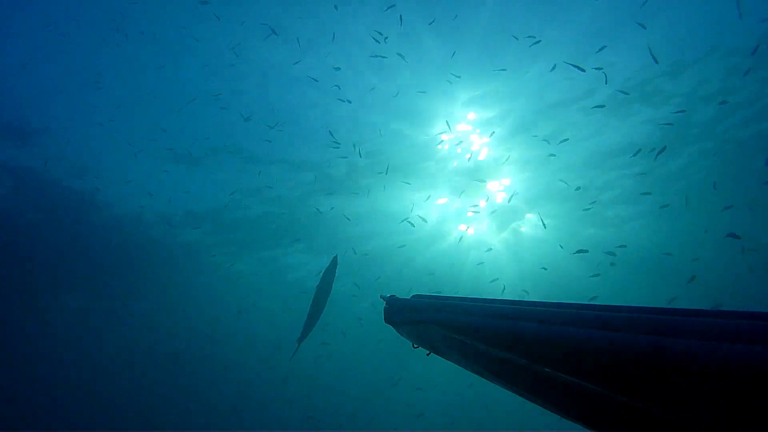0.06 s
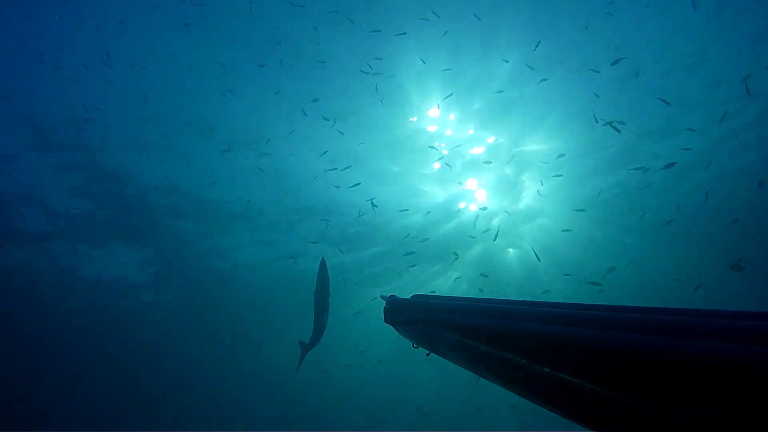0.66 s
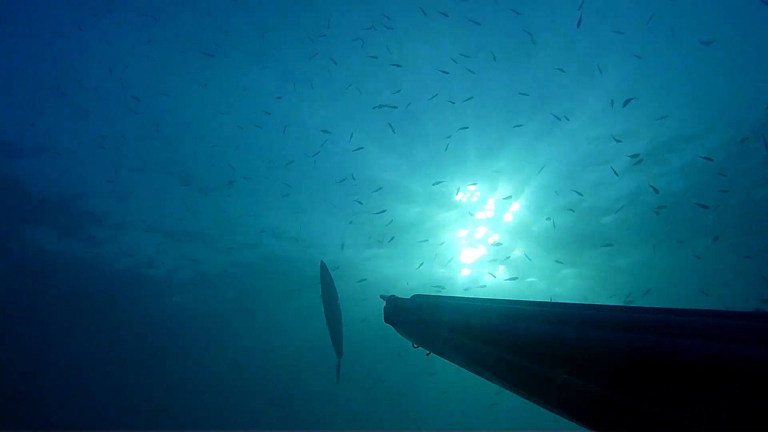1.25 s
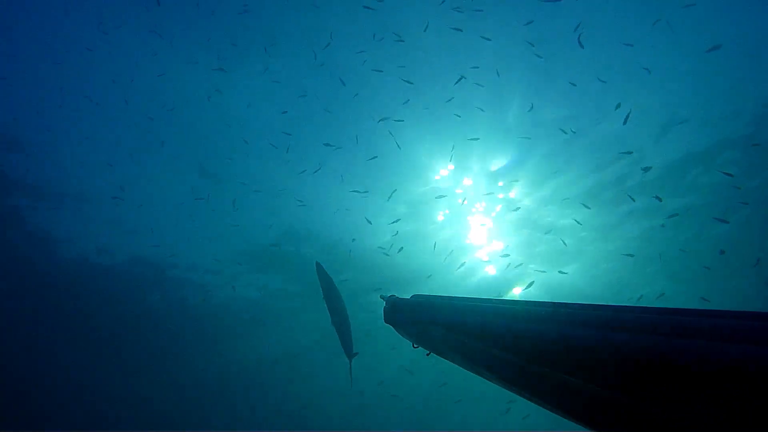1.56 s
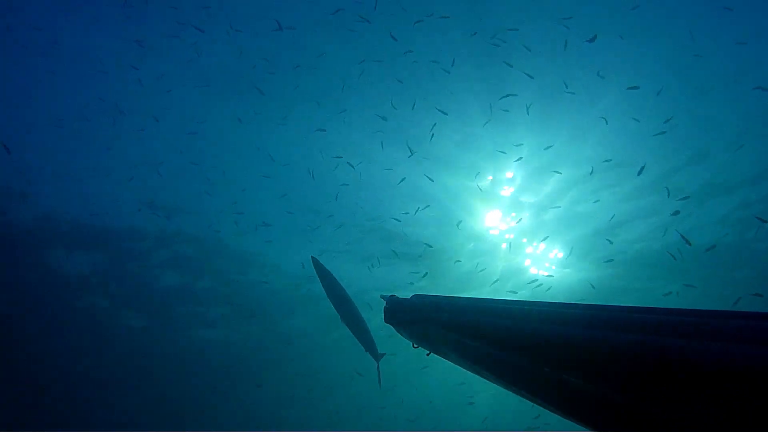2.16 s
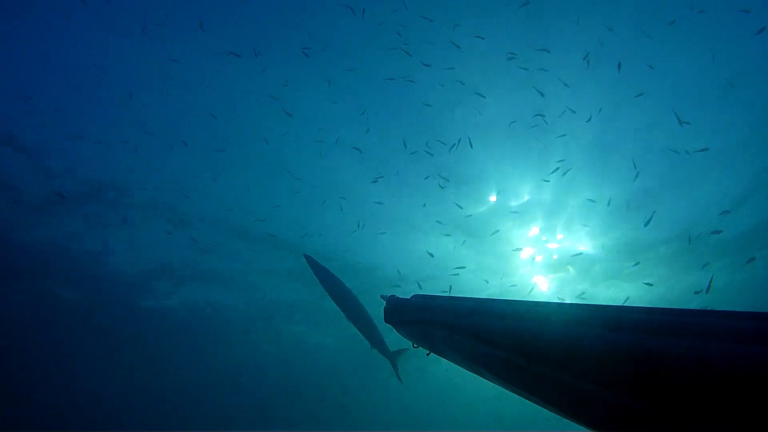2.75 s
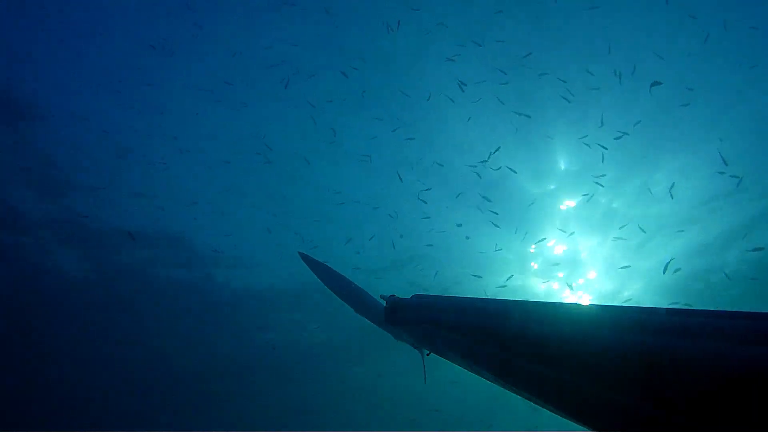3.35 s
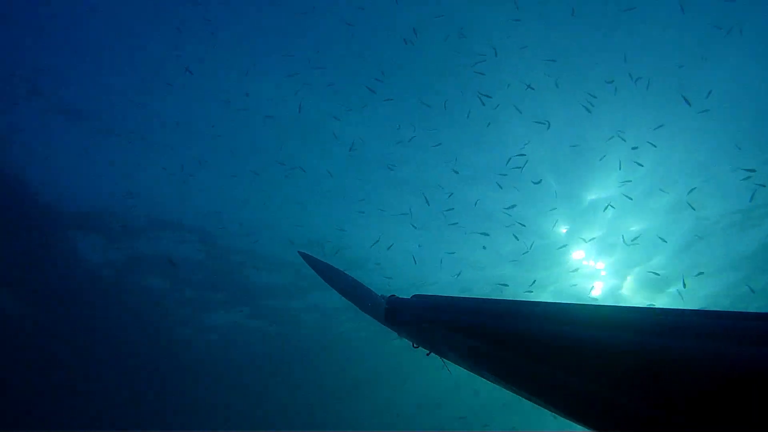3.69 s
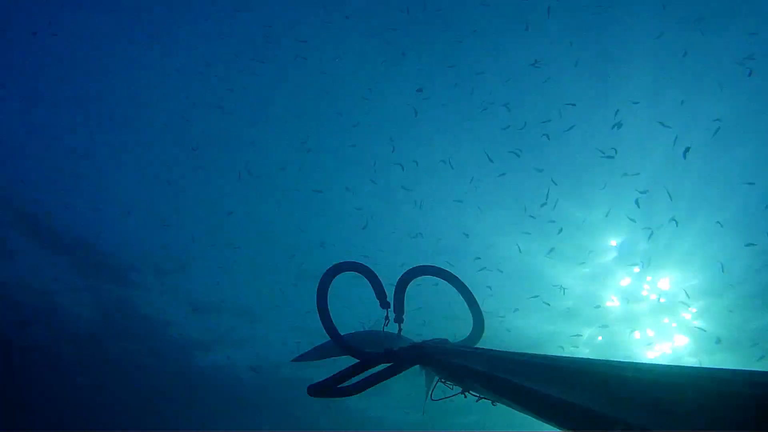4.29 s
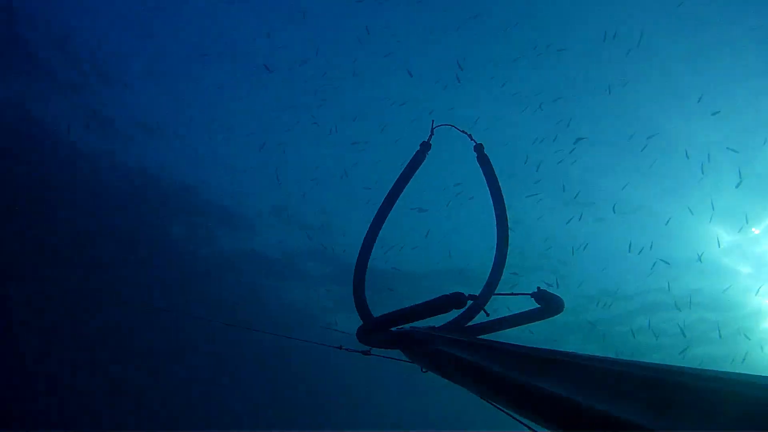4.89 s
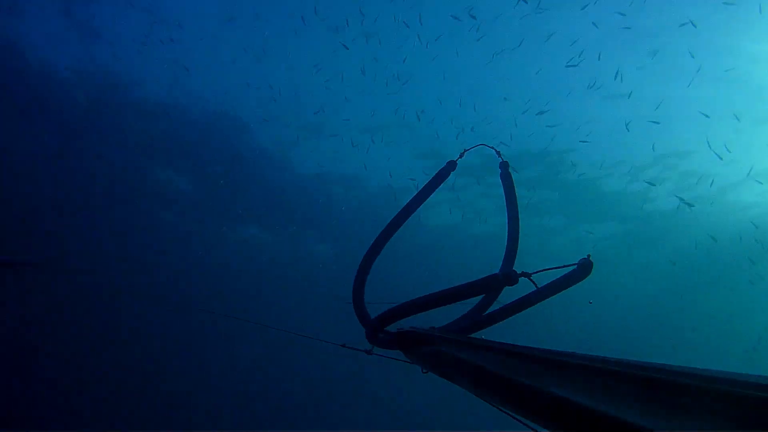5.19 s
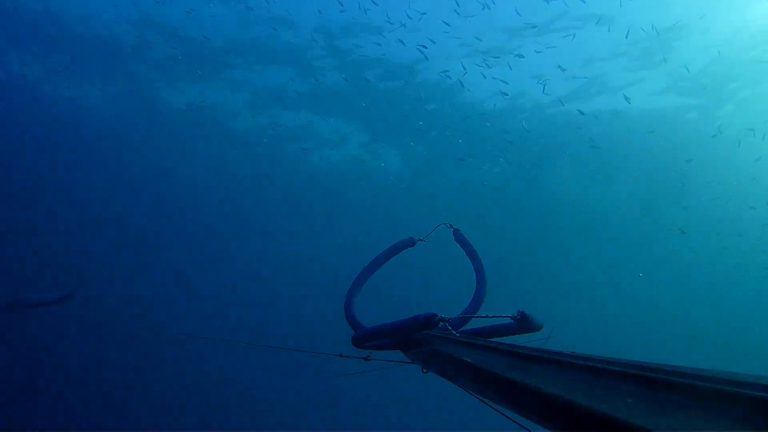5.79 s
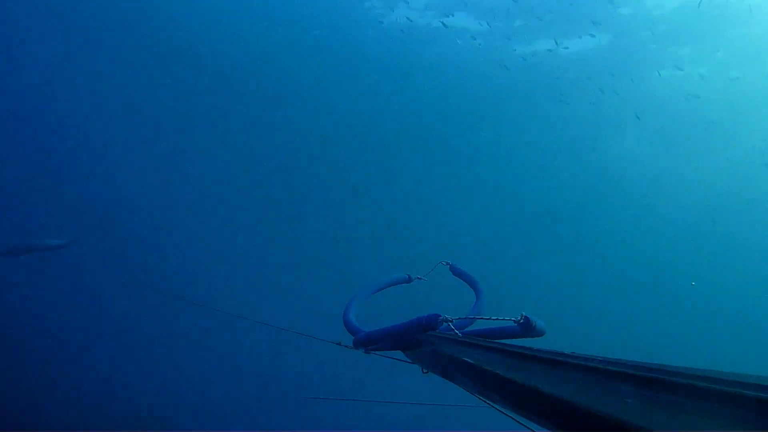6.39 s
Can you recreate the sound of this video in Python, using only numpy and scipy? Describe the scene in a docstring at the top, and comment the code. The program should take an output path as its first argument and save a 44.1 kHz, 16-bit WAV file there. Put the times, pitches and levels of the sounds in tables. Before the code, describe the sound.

A speargun fires underwater with a loud, distorted thump, a short rattle and a whizzing line, amid faint crackling shrimp.

```python
"""A band-powered speargun fired under water, heard from a microphone in a housing on its barrel.
Over the dull wash of the sea, shrimp snap all around while the gun rocks and knocks lightly. At 4.26 s
it fires: the recoil overloads the microphone and the rubbers drive the shaft rattling down its track.
The line whizzes out and jerks taut at 4.77 s. The slack rubbers and their wishbones rub and knock on
the gun, then settle as the wake fizzes away under the shrimp."""
import sys
import numpy as np
from scipy import signal
from scipy.fft import rfft, irfft, next_fast_len
from scipy.io import wavfile
from scipy.ndimage import uniform_filter1d

SR = 44100
rng = np.random.default_rng(int(sys.argv[2]) if len(sys.argv) > 2 else 0)


def master(y):
    """Save y as 16-bit WAV."""
    cut = np.clip(np.atleast_2d(y).T, -1, 1)
    pcm = np.round(cut * 32767)  # scale
    wavfile.write(sys.argv[1], SR, pcm.astype(np.int16))


N = 284004
FIRE_S, STROKE_S = 4.258, .13   # the trigger lets go; time the shaft takes to clear the track
SHAFT_GONE_S = FIRE_S + STROKE_S


def from_db(db):
    """Decibels to gain."""
    return 10 ** (np.asarray(db) / 20)


def unit_rms(x):
    """Scale to unit power."""
    return x / np.sqrt(np.mean(x ** 2) + 1e-20)


def steady(x, window_s):
    """Ride out the slow swells of a vibration, holding it at unit power."""
    return x / np.sqrt(np.abs(uniform_filter1d(x * x, max(int(window_s * SR), 8))) + 1e-12)


def add(track, start_s, sound):
    """Mix a sound into a track at a time."""
    start = int(start_s * SR)
    track[start:start + len(sound)] += sound[:N - start]


def envelope(start_s, attack_s, hold_s, release_s, sag_db_per_s=0):
    """Rise 60 dB per attack time up to the start, hold with a sag, then fall 60 dB per release time."""
    t = np.arange(N) / SR - start_s
    attack_db = 60 * np.minimum(t, 0) / attack_s
    sag_db = sag_db_per_s * np.clip(t, 0, hold_s)
    release_db = 60 * np.maximum(t - hold_s, 0) / release_s
    return from_db(np.maximum(attack_db - sag_db - release_db, -200))


def shaped_noise(spectrum):
    """Steady unit-power noise with a given EQ curve."""
    hz, db = np.transpose(spectrum)
    size = next_fast_len(N)
    bin_hz = np.maximum(np.arange(size // 2 + 1) * SR / size, 1)
    colour = from_db(np.interp(np.log(bin_hz), np.log(hz), db))
    return unit_rms(irfft(rfft(rng.standard_normal(size)) * colour, size)[:N])


def grains(per_s, spread_db):
    """Random clicks of uneven size."""
    sizes = from_db(spread_db * np.minimum(rng.exponential(1, N), 4)) * rng.choice([-1, 1], N)
    return sizes * (rng.random(N) < per_s / SR)


def resonate(x, modes):
    """Parallel resonances, with the skirts outside the group trimmed steeply."""
    out = 0
    for k, (hz, width_hz, db) in enumerate(modes):
        radius = np.exp(-np.pi * width_hz / SR)
        poles = [1, -2 * radius * np.cos(2 * np.pi * hz / SR), radius ** 2]
        ringing = (1 - radius ** 2) / 2 * signal.lfilter([1, 0, -1], poles, x + 1e-18)
        out = out + (-1) ** k * from_db(db) * ringing
    edges_hz = [modes[0][0] * .46, min(modes[-1][0] * 1.217, .45 * SR)]
    return signal.sosfilt(signal.butter(3, edges_hz, "band", fs=SR, output="sos"), out)


def hit(modes, contact_s, scatter_db, scatter_t60, strike_db=-10):
    """A strike, a rough contact and a dying scatter of echoes ring the modes; unit power over 20 ms."""
    t = np.arange(SR // 7) / SR
    contact = t / contact_s * np.exp(1 - t / contact_s)
    scatter = from_db(scatter_db - 60 * t / scatter_t60)
    force = rng.standard_normal(len(t)) * (contact + scatter)
    force[0] += from_db(strike_db) * np.sqrt(np.sum(force ** 2))
    sound = resonate(force, modes)
    return sound / np.sqrt(np.mean(sound[:SR // 50] ** 2))


# EQ curve of the open sea: (frequency [Hz], relative level [dB])
SEA_SPECTRUM = [(29, -25), (50, -7), (81, -7), (204, -5), (476, -8.5), (547, -7.5), (1050, -16.5),
                (1880, -23), (2000, -34), (2600, -41), (4400, -120)]


def sea():
    """The dull wash of open water."""
    return from_db(-54.5) * shaped_noise(SEA_SPECTRUM)


# EQ curve of the far shrimp bed: (frequency [Hz], relative level [dB])
FRYING_SPECTRUM = [(1200, -7.5), (2000, -0.5), (2950, 0), (3900, -4.5), (4500, -3), (5800, -11.5),
                   (6900, -0.5), (8200, -10), (9300, -6), (10100, -12), (10900, -5), (11800, -13.5),
                   (15700, -14.5), (16400, -56)]
# the housing's mid and top modes, rung by snaps in the water: (pitch [Hz], width [Hz], gain [dB])
BODY_MODES = [(1555, 74, -2.5), (2022, 63, -1.5), (2475, 250, -6), (2933, 126, -2), (3627, 234, -6),
              (4350, 74, -3), (4690, 130, -3.5)]
SIZZLE_MODES = [(5380, 410, -1.5), (6920, 1000, -0.5), (9040, 740, -1), (10020, 940, -3.5),
                (12200, 3300, -13)]
# the colony, a nearer and a farther layer: (rate [snaps/s], size spread [dB], body [dB], sizzle [dB])
COLONY_LAYERS = [(8.96, 1.5, -75.5, -76), (70.3, .3, -70, -70.5)]
# foreground snaps, levels before trim: (time [s], body [dB], sizzle [dB], cavity pitch [Hz])
CLOSE_SNAPS = [(0.154, -47.5, -56, 2920), (0.383, -42.5, -51.5, 2120), (0.7458, -50.5, -51, 4410),
               (0.849, -51, -49.5, 2920), (0.8958, -43, -47.5, 3040), (1.021, -65, -55, 3050),
               (1.465, -42, -56, 2800), (1.49, -55, -48.5, 3860), (1.5447, -43.5, -51.5, 2750),
               (1.687, -47, -51, 4380), (1.7657, -40, -50, 2980), (2.1976, -44.5, -48.5, 4400),
               (2.5062, -60, -51, 3000), (2.5666, -41.5, -55, 3140), (2.6507, -54, -52.5, 2880),
               (2.7676, -49.5, -62, 4300), (2.798, -58, -54, 4340), (2.8807, -39, -67, 2440),
               (3.0223, -55, -56, 2590), (3.255, -49.5, -61, 3400), (3.6534, -54.5, -51.5, 2760),
               (3.769, -45, -58, 2960), (3.7966, -42.5, -44.5, 4660), (3.945, -52, -50.5, 3030),
               (4.0066, -58, -52, 3040), (4.0264, -55, -54, 4400), (5.1527, -59, -51, 4460),
               (5.6418, -40, -43.5, 3550), (5.7752, -39, -39, 2880), (5.812, -57, -47, 4400),
               (6.002, -38.5, -49, 2480), (6.122, -55, -50.5, 2720), (6.139, -50.5, -49, 2400),
               (6.2487, -44.5, -38.5, 4470), (6.3686, -39.5, -51, 2920)]


def shrimp():
    """Each snap is a collapsing cavity and its scatter off rocks and surface; far ones merge to frying."""
    out = from_db(-63) * shaped_noise(FRYING_SPECTRUM)
    for per_s, spread_db, body_db, sizzle_db in COLONY_LAYERS:
        snaps = grains(per_s, spread_db)
        body_clicks = snaps * rng.random(N)
        body_ring = hit(BODY_MODES, contact_s=.001, scatter_db=-10, scatter_t60=.08)
        body = signal.fftconvolve(body_clicks, body_ring)[:N]
        sizzle = np.zeros(N)
        for hz, width_hz, db in SIZZLE_MODES:
            clicks = snaps * rng.random(N) ** 2   # every snap has its own colour
            ring = hit([(hz, width_hz, db)], contact_s=.0011, scatter_db=-11, scatter_t60=.066)
            sizzle += from_db(db) * signal.oaconvolve(clicks, ring)[:N]
        out += from_db(body_db) * unit_rms(body) + from_db(sizzle_db) * unit_rms(sizzle)
    for time_s, body_db, sizzle_db, cavity_hz in CLOSE_SNAPS:
        # modes lose 11 dB per octave of distance from the cavity's pitch
        modes = [(hz, width, db - 11 * abs(np.log2(hz / cavity_hz))) for hz, width, db in BODY_MODES]
        body = hit(modes, contact_s=.00052, scatter_db=2.5, scatter_t60=.11)
        sizzle = hit(SIZZLE_MODES, contact_s=.0015, scatter_db=-5, scatter_t60=.14)
        crack = hit(BODY_MODES + SIZZLE_MODES, contact_s=.00018, scatter_db=-18, scatter_t60=.036)
        add(out, time_s, from_db(body_db - 9) * body)
        add(out, time_s, from_db(sizzle_db - 9.5) * sizzle + from_db(sizzle_db - 15) * crack)
    return out


# fader curve of the gun's slow rocking: (time [s], level [dB])
SWAY_CURVE = [(0, -58), (.8, -50), (1.3, -59), (1.75, -49.5), (2.05, -58), (2.85, -48.5), (3.6, -58),
              (4.16, -47), (5.55, -59), (6.301, -52)]
# jolts that swing the gun and flail the rubbers, as the shaft leaves and as the line jerks taut:
# (time [s], sway [dB], eddies [dB], rubbing [dB], rasp [dB], t60 [s])
GUN_JOLTS = [(4.448, -23.5, -29, -26, -32, 0.59), (4.773, -33.5, -33, -27.5, -44.5, 0.77)]
JOLT_ATTACK_S = .058


def sway():
    """The gun rocks in the water: a sub rumble that swells with each jolt."""
    level = from_db(np.interp(np.arange(N) / SR, *np.transpose(SWAY_CURVE)))
    for time_s, sway_db, *_, t60 in GUN_JOLTS:
        level += from_db(sway_db) * envelope(time_s, JOLT_ATTACK_S, 0, t60)
    rumble = resonate(rng.standard_normal(N), [(28.25, 8.9, 0)])
    return level * steady(rumble, window_s=.2)


# the gun's modes in four bands, low to high: (pitch [Hz], width [Hz], gain [dB])
THUMP_MODES = [(81, 11.4, -10), (176.4, 35, -10)]
KNOCK_MODES = [(565.2, 51, -0.5), (632, 40, -5), (721.6, 40.5, -2.5)]
CLACK_MODES = [(1110, 113, -14), (1462.5, 78, -1.5), (1579, 102, -7.5), (1705, 112, -7)]
RING_MODES = [(2934, 370, 1.5), (3193, 56, -1), (3353, 142, 4.5), (3510, 290, -10), (4390, 230, -8.5),
              (4820, 200, -9)]
# hits on the gun, levels before trim: (time [s], thump [dB], knock [dB], clack [dB], ring [dB])
GUN_HITS = [(0.618, -42.5, -41, -50, -75), (0.631, -52, -48, -66, -75), (1.062, -54, -48.5, -52.5, -74),
            (3.189, -44, -68, -65, -79), (4.221, -54, -36.5, -46, -59), (4.453, -21, -27, -23.5, -42),
            (4.466, -40, -23, -26, -39), (4.486, -36, -24, -29, -38.5), (4.52, -21.5, -18, -30, -52),
            (4.5405, -32, -20.5, -14.5, -30), (4.581, -53, -29, -26, -57), (4.615, -41, -38, -51, -50),
            (4.705, -38, -32.5, -45, -40.5), (4.726, -43, -41, -42, -35.5), (4.759, -32, -28, -56, -27.5),
            (4.7694, -26, -14, -30, -25.5), (4.808, -34, -25.5, -27.5, -45.5), (4.842, -44, -44, -39, -59),
            (4.86, -56, -54, -40, -62), (4.951, -39, -52, -38, -55), (4.97, -50, -36, -43, -57),
            (5.043, -45, -47, -50, -56), (5.08, -55, -36, -30, -56), (5.26, -46.5, -36.5, -50, -55),
            (5.508, -44.5, -47, -49.5, -62), (5.773, -47.5, -51.5, -35.5, -55)]


def knocks():
    """Soft rubber rings the low modes of the gun, steel the high ones."""
    out = np.zeros(N)
    for time_s, thump_db, knock_db, clack_db, ring_db in GUN_HITS:
        thump = hit(THUMP_MODES, contact_s=.0023, scatter_db=-6, scatter_t60=.092, strike_db=3)
        knock = hit(KNOCK_MODES, contact_s=.0018, scatter_db=-4, scatter_t60=.15, strike_db=4)
        clack = hit(CLACK_MODES, contact_s=.0007, scatter_db=-23, scatter_t60=.067, strike_db=-1)
        ring = hit(RING_MODES, contact_s=.0012, scatter_db=-24, scatter_t60=.05, strike_db=-19)
        add(out, time_s, from_db(thump_db - 3.5) * thump + from_db(knock_db - 3) * knock)
        add(out, time_s, from_db(clack_db - 6.5) * clack + from_db(ring_db - 6) * ring)
    return out


# kicks that swing and flex the whole gun: (time [s], pitch [Hz], level [dB], t60 [s])
RECOIL_KICKS = [(4.2584, 28.4, -7.5, 0.33), (4.2563, 68.1, 9.5, 0.16), (4.290, 182, 6, 0.22),
                (4.398, 28.2, -13, 0.31), (4.765, 26.6, -17.5, 0.49), (4.77, 77, -34, 0.24)]


def recoil():
    """Each kick starts a low, damped swing; the first ones are strong enough to overload the input."""
    out, t = np.zeros(N), np.arange(SR) / SR
    for time_s, hz, level_db, t60 in RECOIL_KICKS:
        add(out, time_s, from_db(level_db - 60 * t / t60) * np.sin(2 * np.pi * hz * t))
    return out


# boom of water churned by the rubbers: (pitch [Hz], width [Hz], gain [dB])
SURGE_MODES = [(44.1, 47, 0), (104.2, 36, -5.5), (177.3, 49, 2)]


def surge():
    """The rubbers churn the water around the housing, weaker as they shorten."""
    level = from_db(4) * envelope(FIRE_S, .0056, STROKE_S, .07, sag_db_per_s=96)
    return level * steady(resonate(rng.standard_normal(N), SURGE_MODES), window_s=.0172)


def pitch_drop(x, start_s, from_ratio, glide_s):
    """Read a vibration fast at first, so that its pitch sinks to its own value."""
    t = np.maximum(np.arange(N) / SR - start_s, 0)
    ahead_s = (from_ratio - 1) * glide_s * (1 - np.exp(-t / glide_s))
    return np.interp(np.arange(N) + ahead_s * SR, np.arange(N), x)


# hardest slams of shaft and wishbones on the track, before trim: (time [s], force [dB], ring offset [dB])
TRACK_SLAMS = [(4.2572, 6, 0), (4.2604, 9, 1), (4.2707, 1, -6), (4.2816, 12.5, -12), (4.2922, 7, -4),
               (4.2993, 5.5, -8.5), (4.32, 3, -10), (4.348, -9, -4), (4.37, -12, 2.5), (4.385, -10.5, -3),
               (4.4399, -12, -3)]


def shaft():
    """The shaft grinds, bounces and slams along its track; friction fades as the rubbers shorten."""
    slide_s = 4.28
    friction = from_db(3.5) * envelope(slide_s, .032, SHAFT_GONE_S - slide_s, .047, sag_db_per_s=104)
    slips = grains(per_s=2700, spread_db=2.5)
    grind = from_db(-6) * steady(resonate(slips, KNOCK_MODES), window_s=.0052)
    grind += from_db(-13) * steady(resonate(slips, CLACK_MODES), window_s=.012)
    # the track's main resonance sinks as the rubbers slacken
    groan = steady(resonate(slips, [(564.6, 44, 0)]), window_s=.011)
    groan = pitch_drop(groan, slide_s, from_ratio=1.3, glide_s=.045)
    bounces = grains(per_s=280, spread_db=.5)
    rattle = unit_rms(resonate(bounces, CLACK_MODES))
    rattle += from_db(-7) * unit_rms(resonate(bounces, RING_MODES))
    rattle += from_db(-10.5) * unit_rms(resonate(bounces, SIZZLE_MODES))
    out = friction * (grind + from_db(-2) * groan + from_db(-15.5) * rattle)
    for time_s, force_db, ring_db in TRACK_SLAMS:
        clack = hit(CLACK_MODES, contact_s=.00034, scatter_db=-32, scatter_t60=.048, strike_db=-1.5)
        ring = hit(RING_MODES, contact_s=.00056, scatter_db=-21, scatter_t60=.031)
        sizzle = hit(SIZZLE_MODES, contact_s=.0011, scatter_db=-19, scatter_t60=.036)
        metal = from_db(ring_db - 12.5) * ring + from_db(ring_db - 22.5) * sizzle
        add(out, time_s, from_db(force_db) * (from_db(-11.5) * clack + metal))
    return out


# whizz and hiss of the running line: (pitch [Hz], width [Hz], gain [dB])
WHIZZ_MODES = [(3300, 250, -7), (3310, 480, 17)]
HISS_MODES = [(6800, 920, 1.5), (9150, 530, 0), (10900, 700, 1)]


def line():
    """The line runs out with a hiss and a whizz that sinks as the water slows it; its wake fizzes on."""
    running = envelope(SHAFT_GONE_S, attack_s=.03, hold_s=.32, release_s=.43, sag_db_per_s=5)
    slowing_from_s, slowing_per_s = 4.58, .65
    speed = np.clip(1 - slowing_per_s * (np.arange(N) / SR - slowing_from_s), .7, 1)
    fibres = unit_rms(resonate(grains(per_s=2200, spread_db=.5), WHIZZ_MODES))
    whizz = from_db(-51) * np.interp(np.cumsum(speed), np.arange(N), fibres)
    hiss = from_db(-62.5) * unit_rms(resonate(grains(per_s=900, spread_db=3.5), HISS_MODES))
    bubbles = sum(resonate(grains(per_s=54, spread_db=2.5), [mode]) for mode in HISS_MODES)
    wake = from_db(-61.5) * envelope(SHAFT_GONE_S, attack_s=.03, hold_s=0, release_s=6.5)
    return running * (whizz + hiss) + wake * unit_rms(bubbles)


# a rubber slides over the barrel: (time [s], length [s], rubbing [dB], rasp [dB])
RUBBER_SLIDES = [(4.39, .026, -26, -31.5), (4.935, 0.04, -36.5, -41.5), (5.064, .034, -40, -46),
                 (5.148, .02, -56, -57.5), (6.152, .14, -53, -73), (6.396, .04, -55.5, -76)]


def slack_rubbers():
    """With each jolt or slide the rubbers stick and slip on the barrel and eddies buffet the housing."""
    eddies, rubbing, rasp = np.zeros((3, N))
    for time_s, _, eddies_db, rubbing_db, rasp_db, t60 in GUN_JOLTS:
        settling = envelope(time_s, JOLT_ATTACK_S, 0, t60)
        eddies += from_db(eddies_db) * settling
        rubbing += from_db(rubbing_db) * settling
        rasp += from_db(rasp_db) * settling
    for time_s, length_s, rubbing_db, rasp_db in RUBBER_SLIDES:
        sliding = envelope(time_s, attack_s=.034, hold_s=length_s, release_s=.061)
        eddies += from_db(rubbing_db - 6) * sliding
        rubbing += from_db(rubbing_db) * sliding
        rasp += from_db(rasp_db) * sliding
    slips = grains(per_s=500, spread_db=3.5)
    buffeting = resonate(rng.standard_normal(N), [(85, 31, -3), (184, 240, 1.5)])
    return (eddies * steady(buffeting, window_s=.056)
            + rubbing * steady(resonate(slips, KNOCK_MODES), window_s=.036)
            + rasp * steady(resonate(slips, CLACK_MODES), window_s=.066))


def scene():
    """Everything reaches one microphone through the housing."""
    mix = sea() + shrimp() + sway() + knocks() + recoil() + surge() + shaft() + line() + slack_rubbers()
    return mix[None, :]


def record(dry):
    """The input overloads to flat tops, then the treble is cut."""
    ceiling, cutoff_hz = .33, 16200
    oversampled = signal.resample_poly(dry, 4, 1, axis=-1)
    overloaded = signal.resample_poly(np.clip(oversampled, -ceiling, ceiling), 1, 4, axis=-1)
    return signal.sosfilt(signal.ellip(10, .1, 80, cutoff_hz, fs=SR, output="sos"), overloaded)


dry = scene()
out = record(dry)
master(out)
```